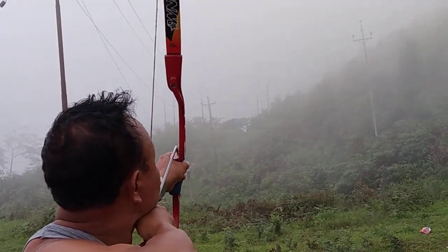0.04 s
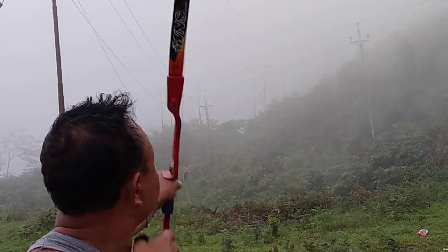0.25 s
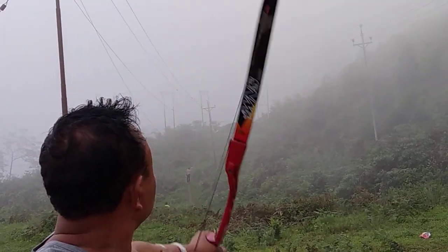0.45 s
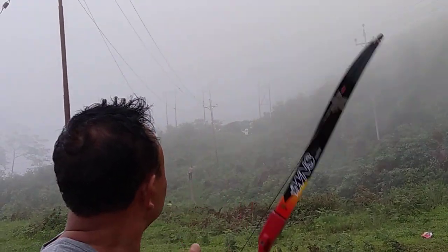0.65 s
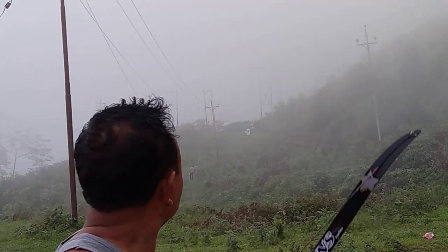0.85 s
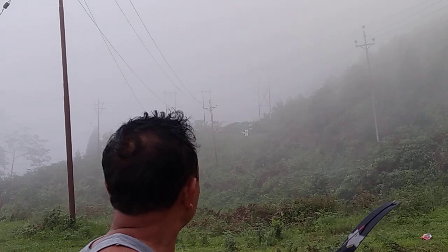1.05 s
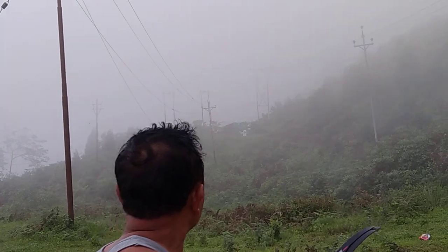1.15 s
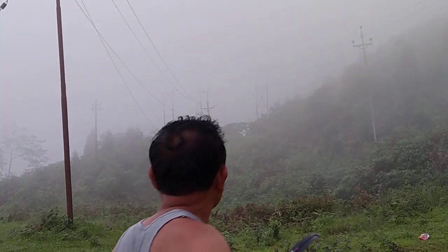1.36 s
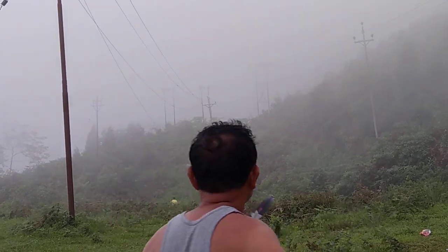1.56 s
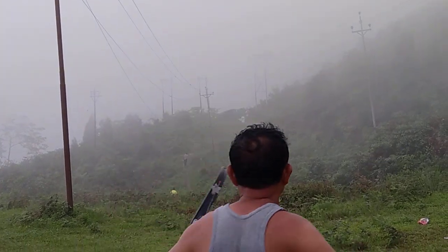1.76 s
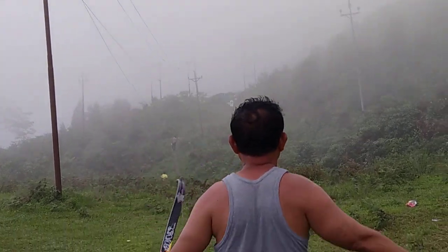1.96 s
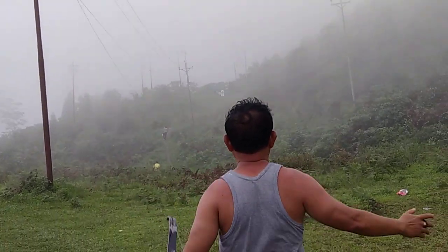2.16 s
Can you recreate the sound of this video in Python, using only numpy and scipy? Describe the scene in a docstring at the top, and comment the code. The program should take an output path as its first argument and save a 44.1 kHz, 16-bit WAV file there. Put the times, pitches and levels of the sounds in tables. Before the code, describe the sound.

A bow is loosed once, very close: a tiny tick, a sharp cracking snap with string slaps, then a low fading twang. Afterwards faint grass rustles, soft steps and distant bird chirps over quiet open-air hush.

```python
"""A recurve bow is loosed once on a misty hillside, over insects (noise bands) and a hush (shaped noise).
The nock ticks (short rings), then the string snaps home and slaps the limbs (clicks in resonances).
String and limbs twang low (ringing sines). The archer then walks off through the grass (grains and puffs
of noise) while far birds whistle (gliding sines). The right microphone hears little bass."""
import sys
import numpy as np
from scipy import signal
from scipy.fft import rfft, irfft, next_fast_len
from scipy.io import wavfile

SR = 44100
rng = np.random.default_rng(int(sys.argv[2]) if len(sys.argv) > 2 else 0)


def transcribe(u):
    """Save the signal u as a 16-bit wav file named by the first command-line argument.

    u: samples, shape (n,) or (channels, n), limited to [-1, 1]; the rate is SR.
    q: integer samples, one column per channel.
    """
    v = np.clip(np.atleast_2d(u).T, -1, 1)
    q = np.round(v * 32767).astype(np.int16)
    wavfile.write(sys.argv[1], SR, q)


N = 97020  # length in samples

# snap of the string, as curves: (time [s], clack level [dB], bright rasp level [dB], knock level [dB])
SNAP_CURVES = [(.199, -75.5, -66, -60), (.204, -49, -49, -47), (.215, -34, -42.5, -41.5),
               (.218, -31.5, -25, -40.5), (.226, -21, -25.5, -28), (.230, -11.5, -16.5, -34.5),
               (.234, -13.5, -27.5, -28), (.237, -17, -29, -29.5), (.241, -9.5, -25, -24.5),
               (.246, -18, -29, -22), (.249, -21.5, -33, -33), (.260, -31, -42.5, -41),
               (.266, -35.5, -37.5, -35), (.296, -41.5, -50.5, -43), (.33, -54, -53, -48),
               (.358, -58, -58, -62), (.42, -54.5, -65.5, -65), (.46, -68.5, -57, -64)]
# what the contacts ring in, four sets: (pitch [Hz], width [Hz], relative level [dB])
CLACK_RESONANCES = [(1766, 230, -6), (2130, 400, -9.5), (2776, 200, -2), (3160, 170, 1), (3450, 440, -6),
                    (3986, 160, -1), (4550, 120, -7.5)]
RASP_RESONANCES = [(6480, 4400, -8.5), (7500, 740, 1.5), (8620, 380, 1.5), (10140, 1200, -3),
                   (12260, 530, -5), (13800, 520, -14)]
KNOCK_RESONANCES = [(610, 200, -13), (774, 130, 1), (1090, 100, -3), (1284, 71, 1)]
THUMP_RESONANCES = [(190, 60, -3), (268, 52, 0), (360, 50, -7), (490, 58, 2), (605.5, 49, -4.5),
                    (140, 27, -7.5)]
# later slaps of the string on the limbs; the row at 1.166 s is a short bright rustle of grass or cloth:
# (time [s], hold [s], time to fade by 60 dB [s], level [dB], rasp against clack [dB])
CONTACT_BURSTS = [(0.277, .006, 0.034, -38, 9.5), (0.252, 0.0056, 0.024, -30, -20),
                  (0.324, .004, 0.058, -50.5, -12), (.306, .004, 0.071, -44.5, -12),
                  (.3615, .008, .02, -51, -7), (.3785, .029, .035, -39, 1.5), (.3875, .002, .015, -43, 2),
                  (.4725, .003, .015, -58, 4), (.481, .003, .035, -52, 5),
                  (0.493, 0.0088, 0.067, -68.5, -10), (1.166, 0.0051, 0.05, -66.5, 16)]
# single hard contacts within the snap and slaps: (time [s], size against the dense contacts [dB])
HARD_CONTACTS = [(.2192, 10.5), (.2298, 6.5), (.2383, 11), (.2402, 12.5), (.2435, 10.5), (.268, 12.5),
                 (.2805, 9), (.3795, 14), (.389, 10.5), (0.395, 10.5), (0.4037, 10), (0.3634, 8.5),
                 (0.4721, 10), (.4815, 10.5)]
# blows that start the twang: (time [s], strength [dB])
TWANG_BLOWS = [(0.2184, -33.5), (.234, -24)]
# range of pitches in each blow: (lowest [Hz], highest [Hz])
BLOW_RANGE_HZ = [110, 1300]
STRING_HZ, STRING_CROSS_HZ = 100.3, 114.7  # the string swings in two planes
# ringing modes of string and limbs: (pitch [Hz], level [dB], time to fade by 60 dB [s])
TWANG_MODES = [(STRING_HZ, -22.5, 3.5), (STRING_CROSS_HZ, -25, 2.1), (195, -7, 0.13), (215, -16, 1),
               (228, -19.5, .8), (246, -21.5, .7), (264.3, -13.5, 0.79), (360, -7, 0.1), (499, -8.5, .56),
               (530, -13, .6), (870, -24, .3)]
# ticks and thuds at bow and feet:
# (time [s], level before panning [dB], pitch [Hz], time to fade by 60 dB [s], left over right [dB])
SHORT_TICKS = [(0.1156, -40.5, 11050, 0.005, 15.5), (.1141, -36.5, 9100, 0.002, 15),
               (0.1129, -46.5, 4440, 0.011, 8), (0.1177, -55, 4200, 0.011, 6),
               (0.1227, -45.5, 4670, 0.0086, -3), (.1141, -52, 2570, 0.0051, 24),
               (0.129, -36, 910, 0.002, 0), (0.127, -51.5, 2200, .004, 23), (.128, -52.5, 356, 0.034, -10),
               (.128, -56, 9600, 0.0097, 14), (.138, -48.5, 810, 0.002, 16), (.138, -43, 2200, 0.0015, 4),
               (.138, -60, 356, 0.083, -1), (.2172, -28.5, 176, 0.078, 2), (0.2184, -23, 269, 0.047, 2),
               (1.385, -55.5, 8150, 0.0082, 0), (1.412, -57, 8150, .01, -2),
               (1.545, -52.5, 3850, 0.016, -19), (1.85, -51, 3930, 0.019, -5),
               (1.96, -57.5, 9220, .006, -2)]
# grass and cloth rustling, as curves: (time [s], treble level [dB], middle level [dB])
RUSTLE_CURVES = [(0.5, -64.5, -61.5), (0.522, -76, -65), (0.674, -79, -77), (0.746, -92, -86),
                 (0.826, -87, -92.5), (0.844, -84, -70), (0.878, -88.5, -108.5), (0.888, -75, -88.5),
                 (0.992, -69.5, -65), (1.044, -91, -73), (1.144, -75, -77), (1.172, -56, -60.5),
                 (1.19, -75, -70.5), (1.232, -66, -73.5), (1.248, -67, -65), (1.276, -73, -85),
                 (1.332, -56.5, -61), (1.346, -75, -92), (1.356, -75, -68), (1.412, -69.5, -70),
                 (1.422, -72, -66.5), (1.494, -83, -82.5), (1.55, -53.5, -57.5), (1.63, -65.5, -68.5),
                 (1.688, -65, -64), (1.712, -60, -67), (1.754, -56.5, -53.5), (1.84, -65.5, -67.5),
                 (1.854, -60, -64), (1.886, -66.5, -65.5), (1.934, -61.5, -70), (1.966, -58.5, -61.5),
                 (2.0, -68, -69.5), (2.094, -71, -68.5), (2.128, -57.5, -58.5), (2.2, -68, -67.5)]
# what the rustle rings in, two sets: (pitch [Hz], width [Hz], relative level [dB])
TREBLE_RESONANCES = [(6500, 2200, -9.5), (7900, 1510, -3.5), (9530, 2300, -7), (11730, 2400, -10),
                     (14100, 1380, -14.5)]
MIDDLE_RESONANCES = [(1225, 690, -9.5), (2350, 650, -1.5), (3055, 670, -1.5), (3957, 970, 1.5),
                     (4590, 1500, -4)]
# soft footfalls: (time [s], length [s], level before the swell [dB], centre pitch [Hz])
FOOTFALLS = [(0.932, 0.041, -68.5, 396), (1.074, 0.052, -69, 347.6), (1.535, 0.059, -69, 600),
             (1.666, 0.018, -64, 574), (1.713, 0.033, -67.5, 886), (1.889, 0.094, -62, 695),
             (2.034, 0.022, -67, 470), (2.087, 0.026, -59.5, 805)]
# bird notes: (time [s], length [s], first pitch [Hz], last pitch [Hz], level before swell and flutter [dB])
BIRD_NOTES = [(0.541, 0.023, 3720, 3760, -68.5), (.572, 0.031, 5030, 4340, -65),
              (0.604, .04, 3960, 3900, -70), (0.653, 0.021, 5080, 4110, -63),
              (0.678, 0.016, 2550, 2720, -66), (0.779, 0.043, 1970, 2092, -73.5),
              (.838, 0.013, 3600, 3875, -62), (0.842, 0.014, 4300, 4100, -63.5),
              (.955, 0.029, 2260, 2380, -70.5), (1.045, 0.03, 2660, 2806, -67),
              (1.248, .085, 2980, 2720, -60), (1.472, .048, 2200, 2950, -63), (1.78, .07, 2440, 2410, -62),
              (1.85, .048, 2360, 2520, -67), (1.395, 0.036, 4800, 4050, -62.5),
              (1.563, 0.0387, 4540, 3790, -61), (1.661, .03, 4900, 4100, -60.5),
              (1.735, 0.038, 2605, 2600, -62), (1.99, 0.053, 2920, 2906, -58.5),
              (2.045, 0.029, 4800, 4160, -67)]
# insect choruses: (pitch [Hz], width [Hz], level before the throb [dB], sings until [s])
INSECT_BANDS = [(5750, 900, -69, 9), (6730, 300, -74, .205), (4540, 300, -80, .205)]
# tone of the air: (pitch [Hz], relative level [dB])
AIR_TONE = [(30, -14.5), (100, -0.5), (222, -3.5), (500, -6.5), (1340, -11.5), (2920, -11.5), (4500, -11.5),
            (6700, -18), (8000, -20.5), (13900, -24), (15000, -37.5)]
# how alike the air is on both sides: (pitch [Hz], likeness [-1 opposite to 1 the same])
AIR_LIKENESS = [(60, 0.15), (130, 0.93), (290, 0.33), (640, 0.16), (1390, -0.02), (3060, -0.31),
                (6720, -0.15), (14800, 0.04)]
# balance of the two microphones: (pitch [Hz], left over right [dB])
MICROPHONE_BALANCE = [(60, 10.5), (110, 14), (200, 13.5), (380, 9), (690, -4.5), (1280, 1.0), (2360, 2.5),
                      (4340, -2), (8010, -1.5), (14800, 1.5)]

SNAP_GRAINS_PER_S, SNAP_SPREAD_DB, SNAP_ALIKE = 4000, 3.5, 0.34
SNAP_LAG_S = .00005  # contacts reach the left late
BURST_ATTACK_S = .001
BURST_KNOCK_DB = -15  # against the burst's clack
THUMP_DB = 2.5  # against the knock
TWANG_WAVER_DB, TWANG_WAVER_PER_S = 1.5, 30
RUSTLE_GRAINS_PER_S, RUSTLE_SPREAD_DB, RUSTLE_ALIKE = 6000, 4.5, 0.095
BIRD_WOBBLE = 0.0048  # as a share of the pitch
BIRD_FALL_BLUR = .3  # pitch blur as a share of a note's fall
BIRD_FLUTTER_DB = 2.5
BIRD_ECHO_S, BIRD_ECHO_DB = 0.0086, -15
BIRD_LAG_S = .00005  # notes reach the left late
INSECT_THROB_DB, INSECT_THROB_PER_S = 1.2, 30
AIR_DB, AIR_PATCHY_DB, AIR_PATCHY_PER_S = -65.5, .8, 2.2
BASS_CUT_HZ, TOP_STOP_HZ = 86, 15645
OVERLOAD = 1.1  # the height that rounded peaks cannot pass


def amp(db):
    """Turn decibels into a plain multiplier."""
    return 10 ** (np.asarray(db) / 20)


def rms_one(x):
    """Scale a sound to an average strength (rms) of 1."""
    return x / np.sqrt(np.mean(x ** 2) + 1e-20)


def in_time(rows):
    """Columns of a curve at every sample, silent outside its span."""
    s, *columns = np.transpose(rows)
    t = np.arange(N) / SR
    return [np.interp(t, s, column, left=-200, right=-200) for column in columns]


def at_hz(points, hz):
    """Read a curve at any pitch, with straight lines on a log pitch scale."""
    point_hz, value = np.array(points).T
    return np.interp(np.log(hz + 1), np.log(point_hz), value)


def drift(rate):
    """Smooth random wandering of spread 1; a higher rate wanders faster."""
    r = np.exp(-2 * np.pi * rate / SR)
    noise = rng.standard_normal(N + SR)
    smooth = signal.lfilter([1], [1, -2 * r, r * r], noise)
    return rms_one(smooth[SR:])  # drop the filter's first second


def resonance(x, hz, width_hz):
    """Let through a band around one pitch, with gain 1 on top."""
    r = np.exp(-np.pi * width_hz / SR)
    feedback = [1, -2 * r * np.cos(2 * np.pi * hz / SR), r * r]
    return signal.lfilter([(1 - r * r) / 2, 0, (r * r - 1) / 2], feedback, x + 1e-18)


def ring(clicks, hz, t60):
    """A unit click starts a sine of height 1 that fades by 60 dB in t60 seconds."""
    r = amp(-60 / (t60 * SR))
    w = 2 * np.pi * hz / SR
    return signal.lfilter([0, np.sin(w)], [1, -2 * r * np.cos(w), r * r], clicks + 1e-18)


def grains(per_s, spread_db, alike):
    """Random stereo clicks of uneven size, partly shared by both sides."""
    size_db = spread_db * np.minimum(rng.exponential(1, (3, N)), 4)
    sign = rng.choice([-1, 1], (3, N))
    present = rng.random((3, N)) < per_s / SR
    shared, *separate = amp(size_db) * sign * present
    alike = np.clip(alike, 0, 1)
    return np.sqrt(alike) * shared + np.sqrt(1 - alike) * np.array(separate)


def body(clicks, gain, table):
    """Clicks under a gain curve ring in side-by-side resonances; a steady gain of 1 would give rms 1."""
    def through(x):
        out = 0
        for k, (hz, width, db) in enumerate(table):
            out = out + (-1) ** k * amp(db) * resonance(x, hz, width)
        return out
    steady_rms = np.sqrt(np.mean(through(clicks) ** 2))
    return through(clicks * gain) / steady_rms


def panned(db):
    """Gains for left and right that differ by db."""
    return amp([[db / 2], [-db / 2]])


def string():
    """Snap, slaps and one late rustle: dense small contacts set four groups of resonances ringing."""
    t = np.arange(N) / SR
    clack, rasp, knock = amp(in_time(SNAP_CURVES))
    for s, hold, t60, db, rasp_db in CONTACT_BURSTS:
        fade_db = 60 * np.maximum(t - s - hold, 0) / t60
        burst = amp(db - fade_db) * np.clip((t - s) / BURST_ATTACK_S, 0, 1)
        clack = clack + burst
        rasp = rasp + burst * amp(rasp_db)
        knock = knock + burst * amp(BURST_KNOCK_DB)
    contacts = grains(SNAP_GRAINS_PER_S, SNAP_SPREAD_DB, SNAP_ALIKE)
    for s, db in HARD_CONTACTS:
        contacts[:, int(s * SR)] = -amp(db)
    contacts[0] = np.roll(contacts[0], round(SNAP_LAG_S * SR))
    out = body(contacts, clack, CLACK_RESONANCES)
    out += body(contacts, rasp, RASP_RESONANCES)
    out += body(contacts, knock, KNOCK_RESONANCES)
    # the thump is the same on both sides
    return out + body(contacts.mean(axis=0), amp(THUMP_DB) * knock, THUMP_RESONANCES)


def twang():
    """Soft blows set the low modes of string and limbs ringing, each wavering a little."""
    blows = np.zeros(N)
    for s, db in TWANG_BLOWS:
        blows[int(s * SR)] = -amp(db)
    soften = signal.butter(2, BLOW_RANGE_HZ, "band", fs=SR, output="sos")
    blows = signal.sosfilt(soften, blows)
    out = np.zeros(N)
    for hz, db, t60 in TWANG_MODES:
        waver_db = TWANG_WAVER_DB * drift(TWANG_WAVER_PER_S)
        out += amp(db + waver_db) * ring(blows, hz, t60)
    return out


def ticks():
    """Ticks and thuds at bow and feet: single clicks, each ringing briefly at one pitch."""
    out = np.zeros((2, N))
    for s, db, hz, t60, pan_db in SHORT_TICKS:
        click = np.zeros(N)
        click[int(s * SR)] = -amp(db)
        out += panned(pan_db) * ring(click, hz, t60)
    return out


def walker():
    """Grass and cloth rustle as many tiny clicks in two bands; footfalls are dull puffs of noise."""
    treble, middle = amp(in_time(RUSTLE_CURVES))
    out = np.zeros((2, N))
    for gain, table in ((treble, TREBLE_RESONANCES), (middle, MIDDLE_RESONANCES)):
        out += body(grains(RUSTLE_GRAINS_PER_S, RUSTLE_SPREAD_DB, RUSTLE_ALIKE), gain, table)
    noise = rng.standard_normal((2, N))
    t = np.arange(N) / SR
    for s, length, db, hz in FOOTFALLS:
        swell = np.sin(np.pi * np.clip((t - s) / length, 0, 1))
        out += amp(db) * rms_one(resonance(noise, hz, 0.54 * hz)) * swell
    return out


def birds():
    """Whistles are gliding near-sine notes with one echo, reaching the left a little late."""
    out = np.zeros(N + SR)
    wobble, blur = drift(60), drift(550)
    for s, length, first_hz, last_hz, db in BIRD_NOTES:
        u = np.linspace(0, 1, int(length * SR))  # progress through the note
        i = int(s * SR)
        end = i + len(u)
        hz = (first_hz + (last_hz - first_hz) * u) * (1 + BIRD_WOBBLE * wobble[i:end])
        hz += BIRD_FALL_BLUR * max(first_hz - last_hz, 0) * blur[i:end]  # only falling notes blur
        flutter_db = BIRD_FLUTTER_DB * wobble[N - end:N - i]  # another stretch of the same wandering
        swell = np.sqrt(2) * np.sin(np.pi * u)
        out[i:end] += amp(db + flutter_db) * swell * np.sin(2 * np.pi * np.cumsum(hz) / SR)
    out += amp(BIRD_ECHO_DB) * np.roll(out, int(BIRD_ECHO_S * SR))
    left = np.roll(out, int(BIRD_LAG_S * SR))
    return np.array([left, out])[:, :N]


def insects():
    """Insects drone as narrow bands of noise that throb unevenly."""
    out = np.zeros((2, N))
    t = np.arange(N) / SR
    for hz, width, db, until in INSECT_BANDS:
        band = rng.standard_normal((2, N))
        for _ in range(2):  # twice through, for steeper sides
            band = resonance(band, hz, width)
        throb_db = INSECT_THROB_DB * drift(INSECT_THROB_PER_S)
        out += rms_one(band) * amp(db + throb_db) * (t < until)
    return out


def air():
    """The hush of the hillside: shaped noise, most alike on both sides in the bass."""
    hz = np.fft.rfftfreq(N, 1 / SR)
    mid, side = rfft(rng.standard_normal((2, N))) * amp(at_hz(AIR_TONE, hz))
    alike = np.clip(at_hz(AIR_LIKENESS, hz), -1, 1)
    both = np.sqrt(1 + alike) * mid + np.sqrt(1 - alike) * side * np.array([[1], [-1]])
    patchy_db = AIR_PATCHY_DB * drift(AIR_PATCHY_PER_S)
    return rms_one(irfft(both, N)) * amp(AIR_DB + patchy_db)


def scene():
    """Add all the sources together."""
    return string() + twang() + ticks() + walker() + birds() + insects() + air()


def record(dry):
    """The microphones differ by frequency; peaks are rounded, bass and top are cut."""
    size = next_fast_len(N + SR // 4)  # spare room at the end
    balance_db = at_hz(MICROPHONE_BALANCE, np.fft.rfftfreq(size, 1 / SR))
    right = 2 / (1 + amp(balance_db))
    left = 2 - right
    wet = irfft(rfft(dry, size) * [left, right], size)[:, :N]
    wet = OVERLOAD * np.tanh(wet / OVERLOAD)
    bass_cut = signal.butter(2, BASS_CUT_HZ, "high", fs=SR, output="sos")
    top_cut = signal.cheby2(12, 70, TOP_STOP_HZ, fs=SR, output="sos")  # 70 dB down from there up
    return signal.sosfilt(top_cut, signal.sosfilt(bass_cut, wet))


dry = scene()
out = record(dry)
transcribe(out)
```